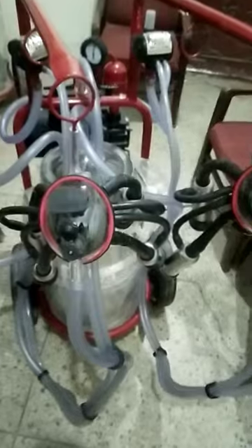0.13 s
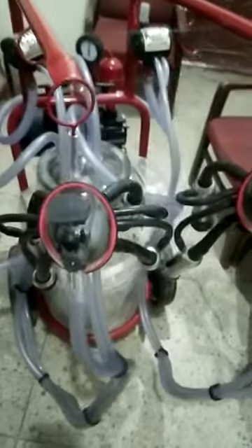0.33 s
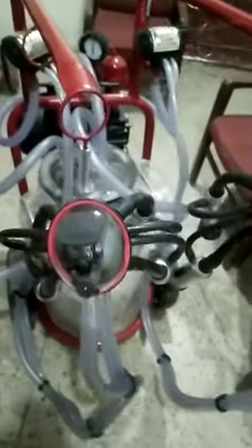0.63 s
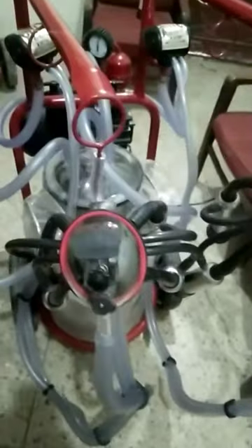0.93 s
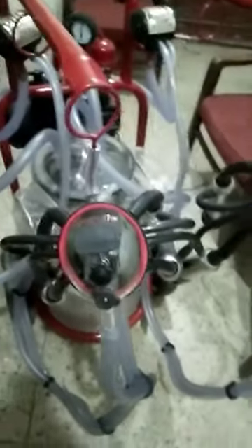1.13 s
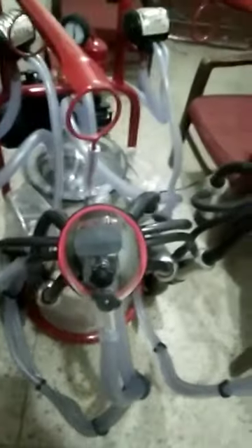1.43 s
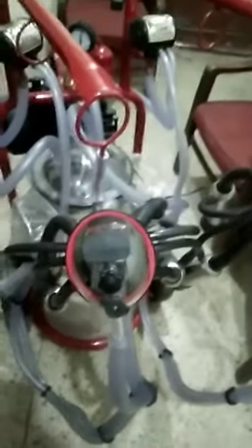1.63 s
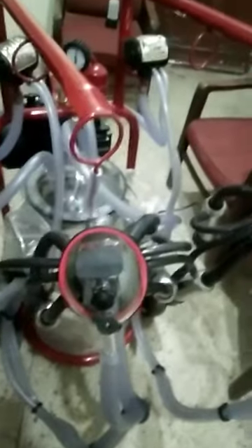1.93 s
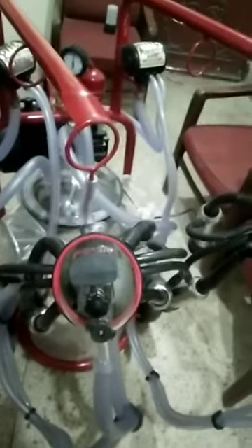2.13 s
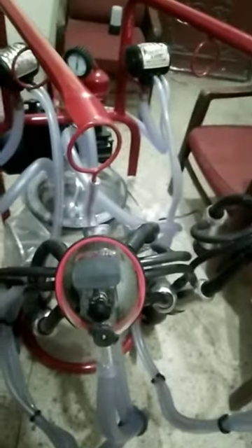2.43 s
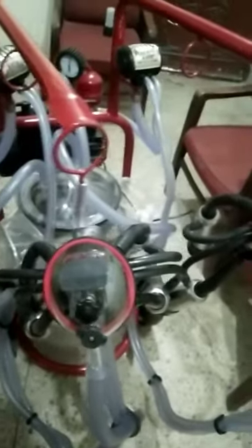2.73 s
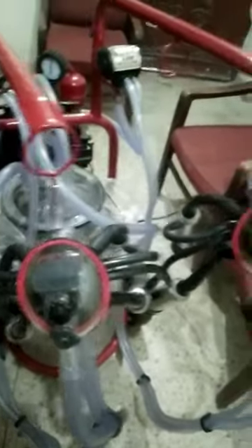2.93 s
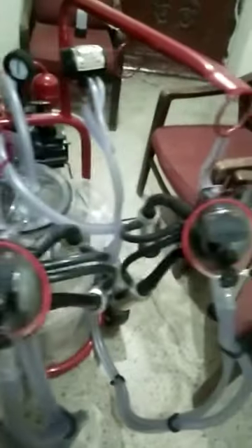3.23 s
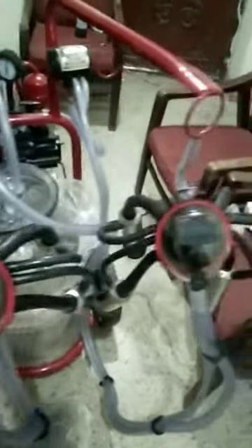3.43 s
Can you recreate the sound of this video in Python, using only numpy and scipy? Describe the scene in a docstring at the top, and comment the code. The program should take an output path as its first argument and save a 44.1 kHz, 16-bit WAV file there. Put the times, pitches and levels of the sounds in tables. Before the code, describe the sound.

A milking machine pump drones and hisses while its valves puff and click rapidly.

```python
"""The vacuum pump of a portable milking machine drones, whines and rattles over a steady hiss of air.
Two pulsators, the valves that switch the suction, tick at slightly different rates: on each stroke
air rushes in, then the sliding valve snaps against its stop. The machine is about a metre away in a
hard-walled farm room, and its sound fades in at the start."""
import sys
import numpy as np
from scipy import signal
from scipy.fft import rfft, irfft
from scipy.io import wavfile
from scipy.ndimage import uniform_filter1d

SR = 44100
rng = np.random.default_rng(int(sys.argv[2]) if len(sys.argv) > 2 else 0)


def wrap_up_sound(samples):
    """Save the sound to the file named by the first command line argument, as 16-bit audio."""
    columns = np.atleast_2d(samples).T
    # keep every value between -1 and 1, then stretch to whole-number steps
    tamed = np.clip(columns, -1, 1)
    steps = np.round(tamed * 32767).astype(np.int16)
    wavfile.write(sys.argv[1], SR, steps)


N = 158319


def gain(db):
    """Turn decibels into a multiplier."""
    return 10 ** (np.asarray(db) / 20)


def level(x, db):
    """Set a sound's average (rms) level."""
    return x * gain(db) / np.sqrt(np.mean(x ** 2))


def wander(rate_hz):
    """A smooth random curve that strays by about 1."""
    k = int(SR / rate_hz)
    steps = np.repeat(rng.standard_normal(N // k + 1), k)
    curve = uniform_filter1d(uniform_filter1d(steps, k), k)[:N]
    return curve / curve.std()


def colour(x, points):
    """Shape a sound's tone along a curve of (Hz, dB) points."""
    hz, db = np.array(points, float).T
    size = 2 * len(x)
    freqs = np.maximum(np.fft.rfftfreq(size, 1 / SR), 1)
    cepstrum = irfft(np.log(gain(np.interp(np.log(freqs), np.log(hz), db))))
    cepstrum[1:size // 2] *= 2  # folded so nothing rings before it is struck
    cepstrum[size // 2 + 1:] = 0
    return irfft(rfft(x, size) * np.exp(rfft(cepstrum)))[:len(x)]


def ring(x, hz, width_hz):
    """Make a sound ring around one pitch."""
    return signal.lfilter(*signal.iirpeak(hz, hz / width_hz, fs=SR), x)


def split(x, hz):
    """The parts below and above a frequency."""
    low = signal.sosfiltfilt(signal.butter(2, hz, fs=SR, output="sos"), x)
    return low, x - low


def add(out, x, start_s):
    """Mix a sound in at a given time."""
    i = int(start_s * SR)
    if 0 <= i < N:
        out[i:i + len(x)] += x[:N - i]


# The drone's tones. Each row: multiple of the shaft's speed, relative level in dB.
DRONE_TONES = [(1, -36), (2, -35), (3, -31), (4, -6), (5, -27.5), (6, -22), (7, -21), (8, -8), (9, -17),
               (10, -20), (11, -16), (12, -5), (13, -18), (14, -26), (15, -29), (16, 0.5), (17, -72.5),
               (18, -13), (19, -16), (20, -3.5), (21, -43), (22, -23), (23, -24.5), (24, -26), (25, -27),
               (26, -29.5), (27, -39.5), (28, -18), (29, -29.5), (30, -57), (31, -29), (32, -19.5),
               (33, -45), (34, -49)]

def pump_drone(turns):
    """Four vanes make four suction pulses a turn; their unevenness adds the tones in between."""
    drone = 0
    for multiple, db in DRONE_TONES:
        offset = rng.random() * (multiple % 2)  # even multiples stay lined up
        tone = np.cos(2 * np.pi * (multiple * turns + offset))
        drone -= gain(db + 0.21 * wander(4.9)) * tone
    return level(drone, -19)


SHAFT_HZ = 23.765
# The whine's tones. Each row: rough pitch in Hz, relative level in dB.
WHINE_TONES = [(855.9, -55.5), (1044, -49.5), (1071, -47.5), (1093, -52), (1308, -60), (1330, -49),
               (1475, -54), (1497, -54.5), (1523, -51)]

def pump_whine(turns):
    """The casing whines thinly at whole multiples of the shaft's speed."""
    whine = 0
    for hz, db in WHINE_TONES:
        strength = gain(db + 1.5 * wander(6.07))
        whine += strength * np.cos(2 * np.pi * (round(hz / SHAFT_HZ) * turns + rng.random()))
    return level(whine, -45.5)


# The rattle's tone. Each row: frequency in Hz, relative level in dB.
RATTLE_COLOUR = [(750, -21), (830, 0), (960, -12), (1070, 6), (1200, -1), (1500, -2), (1700, -14),
                 (2000, 2), (3000, -9.5), (5000, -47), (12000, -78)]

def pump_rattle(turns):
    """The casing repeats the same rattle on every turn, pulsing with the four vanes."""
    one_turn = irfft(np.exp(2j * np.pi * rng.random(int(SR / SHAFT_HZ / 2))))  # a scrap of noise
    rattle = np.interp(turns % 1, np.linspace(0, 1, len(one_turn)), one_turn)
    pulsing = 1 + 0.3 * np.cos(2 * np.pi * 4 * turns)
    return level(colour(rattle * pulsing, RATTLE_COLOUR), -44)


# The hiss's tone. Each row: frequency in Hz, relative level in dB.
HISS_COLOUR = [(25, -13), (60, 8), (110, 11), (400, 15.5), (600, 4.5), (850, 2), (1100, 4), (1750, -1.5),
               (2600, 1.5), (3000, 5), (3350, 2.5), (4100, 5), (5300, 4.5), (7000, -2.5), (8000, -0.5),
               (10000, -11.5), (12500, -19), (15500, -48)]

def air_hiss():
    """Air leaks steadily through the regulator and exhaust; its level flickers slightly."""
    hiss = level(colour(rng.standard_normal(N), HISS_COLOUR), -31)
    return hiss * gain(0.57 * wander(14))


def swell(age, rise_s, fall_s):
    """Air flow grows to its peak at age 0, then dies away."""
    return np.exp(1 - np.hypot(age / np.where(age < 0, rise_s, fall_s), 1))


# The tone of each pulsator's air port. Each row: frequency in Hz, relative level in dB.
PORT_COLOUR = {"slow": [(1000, -16.5), (3300, -14), (4100, 0.5), (4700, 0.5), (5500, -1), (6200, -2.5),
               (7000, -7.5), (8500, -10.5), (11000, -18.5), (15500, -36)], "fast": [(1000, -5.5),
               (3300, -2.5), (4100, 7), (5300, 5.5), (7000, -3.5), (8300, -1), (9500, -4), (12000, -16.5),
               (15500, -24)]}
# Each pulsator's whistle: pitch in Hz, width in Hz, level in dB.
PORT_WHISTLE = {"slow": (5650, 670, -35), "fast": (5420, 550, -40)}
# Each pulsator's puff: rise, fall and the treble's head start, all in seconds.
PUFF_TIMES = {"slow": (0.02, 0.013, 0.02), "fast": (0.018, 0.016, 0.012)}

def air_puffs(t, pulsator, peaks_s, air_db, treble_db):
    """Air rushes in through a port: each puff starts bright and whistles at its height."""
    rise_s, fall_s, head_start_s = PUFF_TIMES[pulsator]
    hz, width_hz, whistle_db = PORT_WHISTLE[pulsator]
    rush = colour(rng.standard_normal(N), PORT_COLOUR[pulsator])
    body, treble = split(level(rush, air_db), hz=6950)
    whistle = level(ring(rush, hz, width_hz), whistle_db)
    out = np.zeros(N)
    for peak_s in peaks_s:
        flow = swell(t - peak_s, rise_s, fall_s)
        early_flow = swell(t - peak_s + head_start_s, rise_s, fall_s)
        out += body * flow + whistle * flow ** 2 + gain(treble_db) * treble * early_flow
    return out


# The tone of the valve's housing. Each row: frequency in Hz, relative level in dB.
HOUSING_COLOUR = [(900, -23), (1700, -9.5), (2200, 0.5), (2500, 0.5), (2900, 5.5), (3500, 1.5), (4300, 4.5),
                  (5000, -7), (6300, 0), (7500, -4.5), (10000, -15), (15500, -32)]

def valve_snap(low_hz, low_db, high_hz, high_db, crack_db):
    """The valve hits its stop and chatters briefly: a tick, a crack and two rings of the housing."""
    t = np.arange(SR // 4) / SR

    def hit(decay_s, impact=0):
        chatter = rng.standard_normal(len(t)) * np.exp(-t / decay_s)
        return colour(chatter + impact * (t == 0), HOUSING_COLOUR)

    low = ring(hit(decay_s=0.022, impact=1.7), low_hz, width_hz=195)
    low *= 1 - np.exp(-t / 0.0056)  # takes a moment to build
    high = ring(hit(decay_s=0.0069, impact=11.6), high_hz, width_hz=91)
    crack = hit(decay_s=0.013)
    tick = hit(decay_s=0.0013)
    parts = [(low, low_db), (high, high_db), (crack, crack_db), (tick, -35)]
    # each level is set as if the part lasted 0.04 seconds
    return sum(x * gain(db) / np.sqrt(np.sum(x ** 2) / (0.04 * SR)) for x, db in parts)


# Seconds each pulsator takes to slide out and back.
ROUND_TRIP_S = {"slow": 1.0338, "fast": 0.9038}
# When each pulsator first snaps in each direction, in seconds.
FIRST_HIT_S = {"slow": {"out": 0.5671, "back": 0.0456}, "fast": {"out": 0.4950, "back": 0.0607}}
# Each row: pulsator, direction, low ring's pitch in Hz and level in dB, the same for the high ring,
# crack level in dB, seconds from puff to snap, puff level in dB, puff's extra treble in dB.
VALVE_STROKES = [("slow", "out", 2970, -23.5, 3937, -21.5, -30.5, 0.23, -28.5, 0),
                 ("slow", "back", 2970, -24, 4010, -29, -30, 0.23, -28.5, 0),
                 ("fast", "out", 2990, -25.5, 3950, -22, -31.5, .215, -28, 0),
                 ("fast", "back", 2940, -26.5, 3970, -27, -31, 0.24, -30, 0)]

def pulsators(t):
    """Each stroke comes once per round trip: a puff of air, then the snap."""
    out = np.zeros(N)
    for pulsator, direction, *snap_settings, lead_s, air_db, treble_db in VALVE_STROKES:
        snaps_s = np.arange(FIRST_HIT_S[pulsator][direction], t[-1] + lead_s, ROUND_TRIP_S[pulsator])
        out += air_puffs(t, pulsator, snaps_s - lead_s, air_db, treble_db)
        for start_s in snaps_s:
            add(out, valve_snap(*snap_settings), start_s)
    return out


def room(x):
    """Hard walls add a short wash of echoes."""
    gap_s, low_fade_s, high_fade_s = 0.0073, 0.41, 0.43  # a fade is a drop of 60 dB
    t = np.arange(SR) / SR
    low, high = split(rng.standard_normal(len(t)), hz=3300)
    tail = (low * gain(-60 * t / low_fade_s) + high * gain(-60 * t / high_fade_s)) * (t > gap_s)
    tail /= np.sqrt(np.sum(tail ** 2))
    return x + gain(-3) * signal.fftconvolve(x, tail)[:N]


# Each row: delay in milliseconds, level in dB compared with the direct sound.
CLOSE_ECHOES = [(2.9, -22), (4.7, -18.5), (7.6, -15.5), (11.3, -17.5)]

def close_echoes(x):
    """Bounces off the churn, frame and floor change the tone but keep the level."""
    out = x.copy()
    for ms, db in CLOSE_ECHOES:
        add(out, gain(db) * x, ms / 1000)
    return out * x.std() / out.std()


def scene():
    """Pump, hiss and pulsators, the same in both ears."""
    t = np.arange(N) / SR
    speed_hz = SHAFT_HZ * (1 + 0.0001996 * wander(2))
    first_vane_s = 0.0115
    turns = np.cumsum(speed_hz) / SR - SHAFT_HZ * first_vane_s
    pump = pump_drone(turns) + pump_whine(turns) + pump_rattle(turns)
    return np.tile(pump + close_echoes(air_hiss() + room(pulsators(t))), (2, 1))


# The opening fade, then an extra one for the bass. Each row: time in seconds, level change in dB.
OPENING_FADE = [(0.135, -11), (0.21, -6), (0.255, -4), (0.3, 0), (0.45, 0), (0.7, 0.5)]
BASS_FADE = [(0.135, -11), (0.3, -14), (0.42, -8.5), (0.8, -5.5)]

def record(dry):
    """After a brief silence the sound fades in, bass last; the highest treble is cut."""
    silence_s, open_s, bass_hz, top_hz = 0.132, 0.004, 206, 15650
    t = np.arange(N) / SR
    fade = lambda curve: gain(np.interp(t, *np.array(curve).T))
    bass, rest = split(dry, bass_hz)
    opening = np.clip((t - silence_s) / open_s, 0, 1)
    heard = (bass * fade(BASS_FADE) + rest) * fade(OPENING_FADE) * opening
    return signal.sosfilt(signal.ellip(8, .2, 70, top_hz, fs=SR, output="sos"), heard)


dry = scene()
out = record(dry)
wrap_up_sound(out)
```